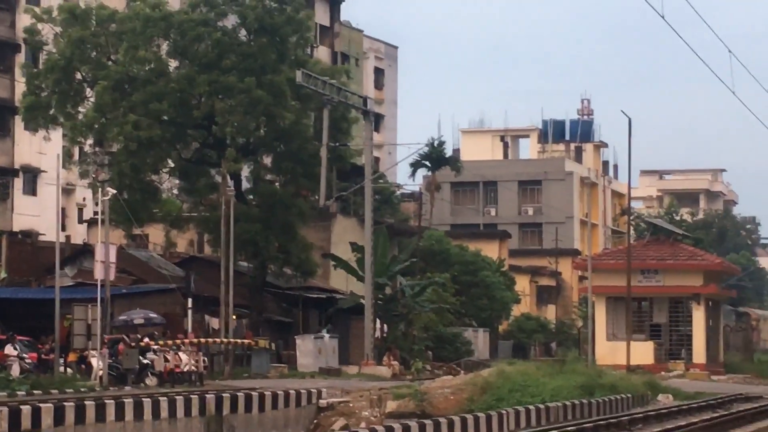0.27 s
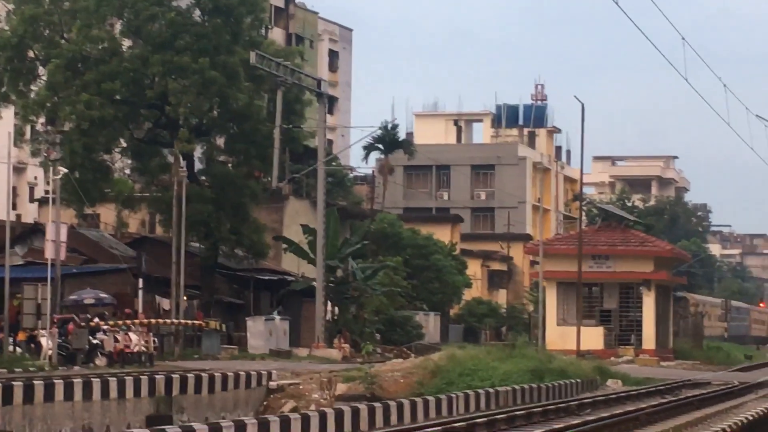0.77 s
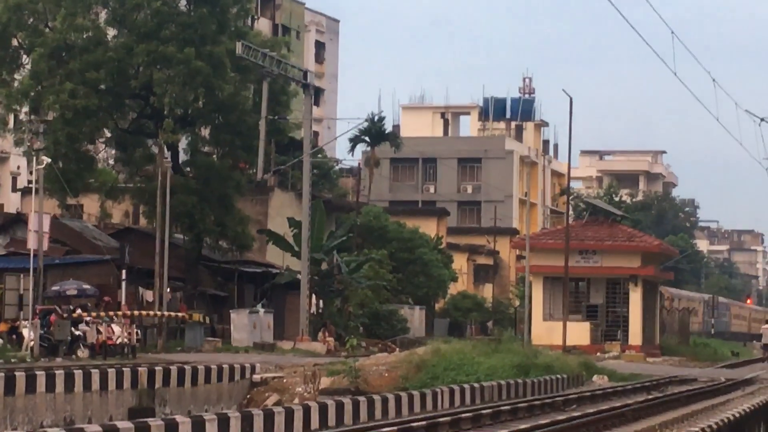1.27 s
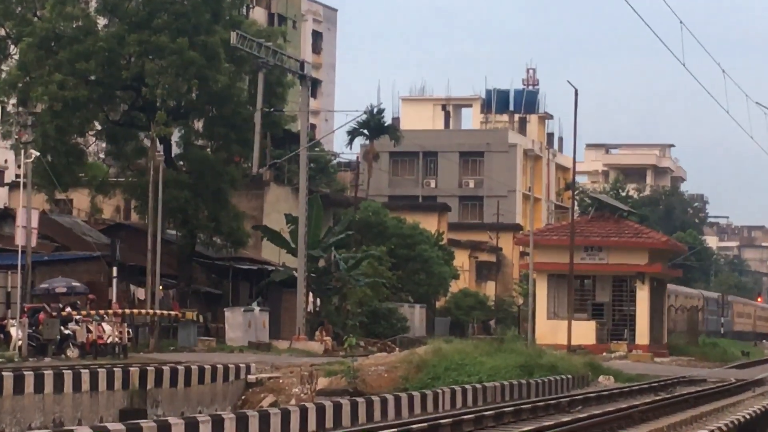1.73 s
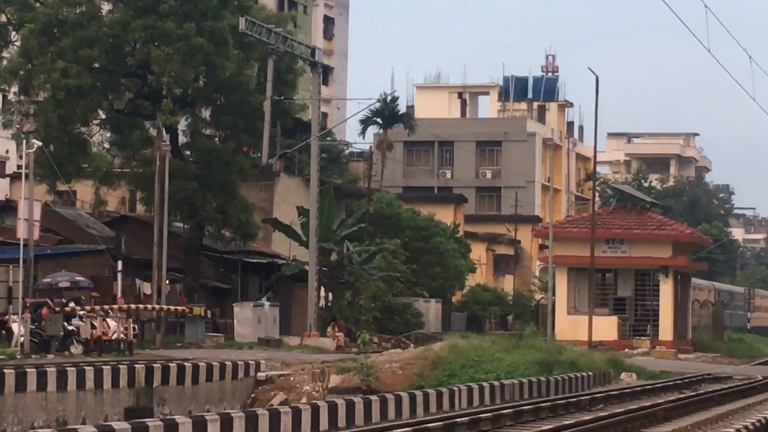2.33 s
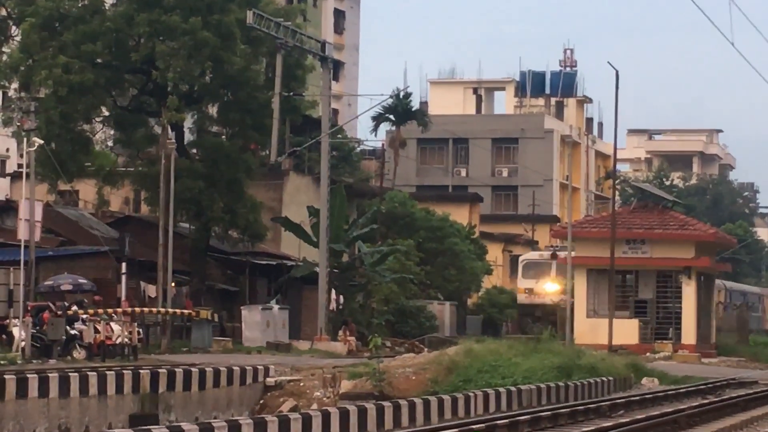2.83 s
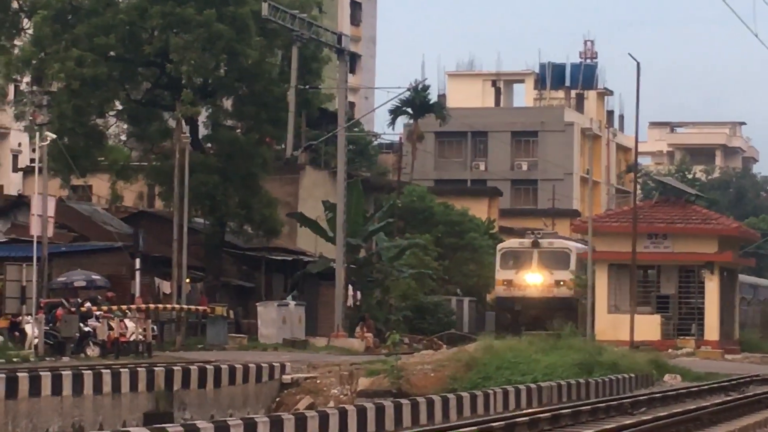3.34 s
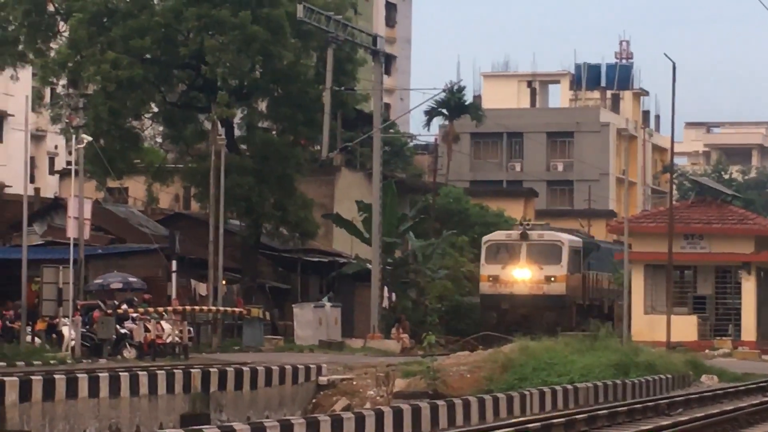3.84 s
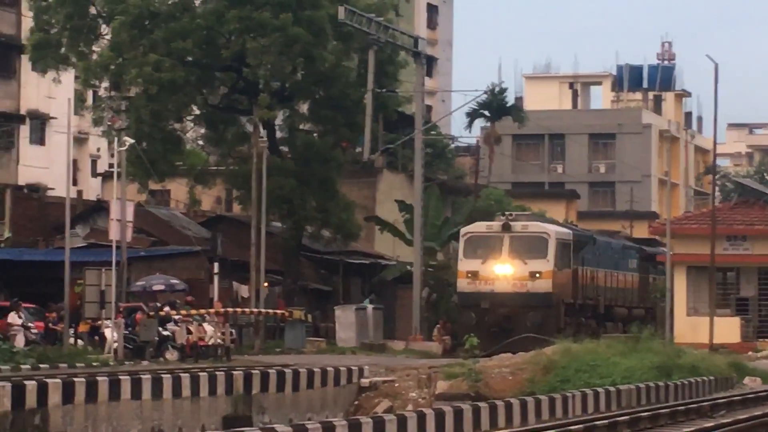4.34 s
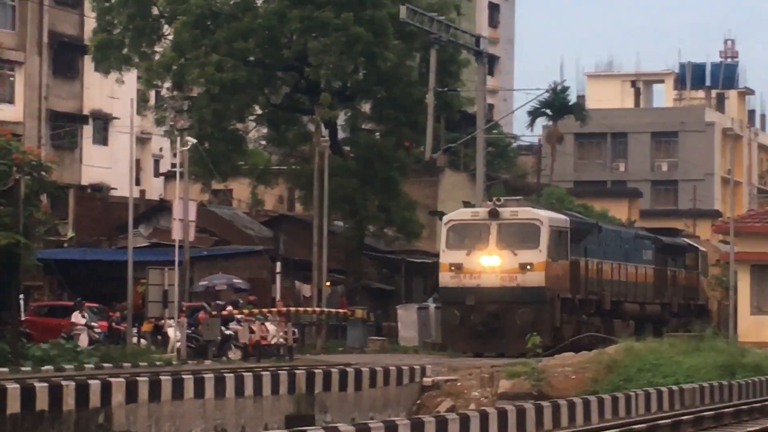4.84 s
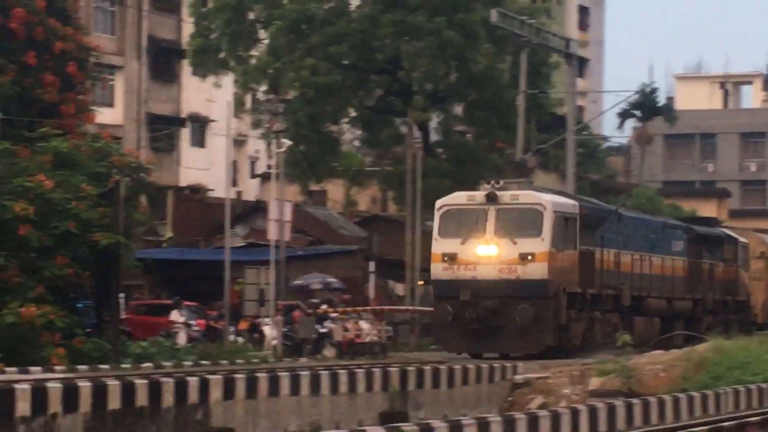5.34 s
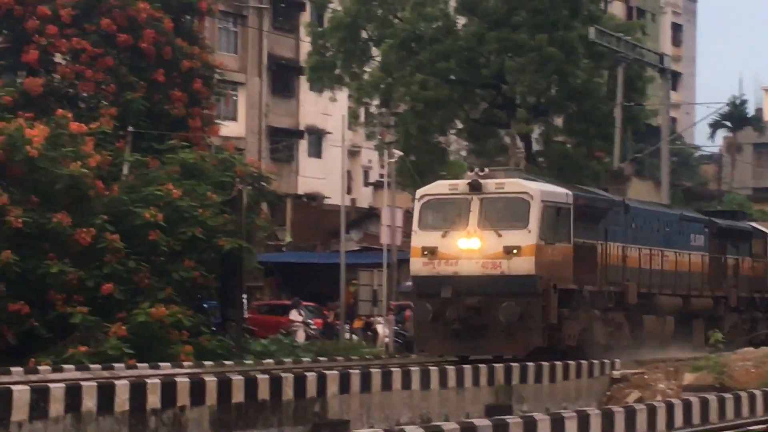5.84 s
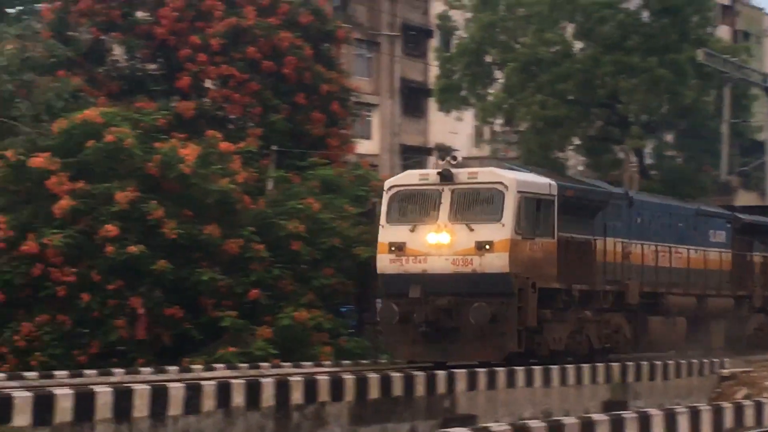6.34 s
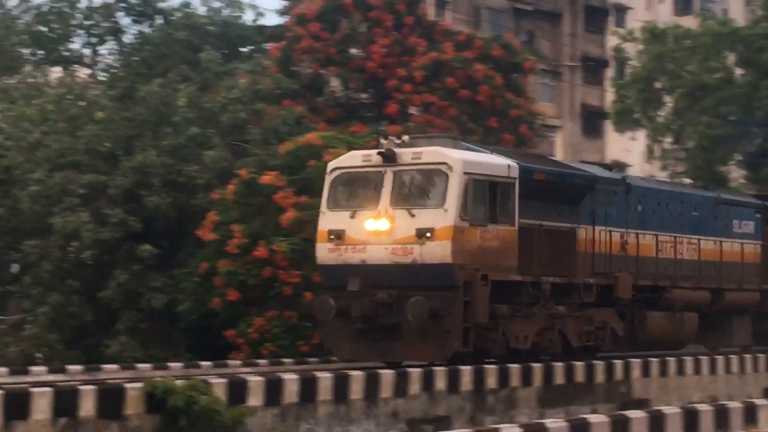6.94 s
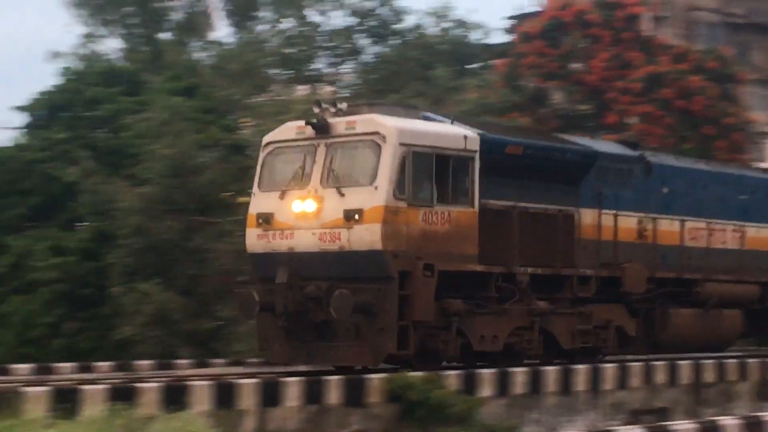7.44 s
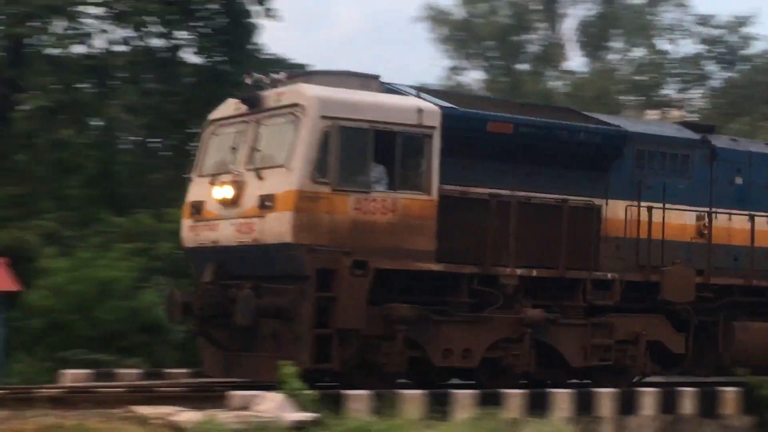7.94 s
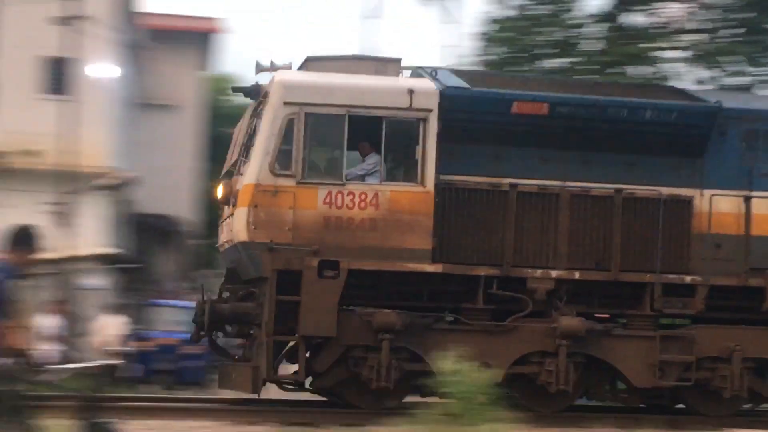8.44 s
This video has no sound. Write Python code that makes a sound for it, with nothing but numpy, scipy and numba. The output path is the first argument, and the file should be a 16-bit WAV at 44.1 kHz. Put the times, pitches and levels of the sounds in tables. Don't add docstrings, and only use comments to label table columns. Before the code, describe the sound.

Outdoors beside a railway in a town, a diesel locomotive approaches. Its low, uneven exhaust boom wavers in and out among buildings over a deep rumble, broad roar and airy hiss, with tiny wheel squeaks. Everything grows for nearly eight seconds, then a two-note air horn blasts close by, echoing off walls while the phone's automatic gain pushes the engine down.

```python
import sys
import numpy as np
from scipy import signal
from scipy.fft import rfft, irfft
from scipy.io import wavfile
from scipy.ndimage import uniform_filter1d
from numba import njit

SR = 44100
rng = np.random.default_rng(int(sys.argv[2]) if len(sys.argv) > 2 else 0)


def to_wav(s):
    ch = np.atleast_2d(s).T
    pcm = np.round(np.clip(ch, -1, 1) * 32767)
    wavfile.write(sys.argv[1], SR, pcm.astype(np.int16))


def convert_level_to_amplitude(level_db):
    exponent = np.asarray(level_db, float) / 20
    return 10 ** exponent


N = 383669
T = np.arange(N) / SR


def curves(table):
    s, *columns = np.transpose(table)
    return [np.interp(T, s, column) for column in columns]


def colour(points, hz):
    f, db = np.transpose(points)
    return convert_level_to_amplitude(np.interp(np.log(np.maximum(hz, 1)), np.log(f), db, left=-90, right=-90))


def noise(points, lo_hz, hi_hz):
    hz = np.fft.rfftfreq(N, 1 / SR)
    spectrum = rfft(rng.standard_normal(N)) * colour(points, hz)
    band = irfft(spectrum * ((hz > lo_hz) & (hz < hi_hz)), N)
    return irfft(spectrum, N) / np.std(band)


def walk(rate):
    k = int(SR / rate)
    held = np.repeat(rng.standard_normal(400), k)[:N]
    return 1.42 * uniform_filter1d(uniform_filter1d(held, k), k)


@njit
def ring(x, hz, width):
    y, band, low = np.empty(len(x)), 0., 0.
    for i in range(len(x)):
        g, k = np.tan(np.pi * hz[i] / SR), width / hz[i]
        v = (band + g * (x[i] - low)) / (1 + g * (g + k))
        band, low, y[i] = 2 * v - band, low + 2 * g * v, k * v
    return y


def bump(s, length, t=T):
    return np.exp(-(2 * (t - s) / length) ** 2)


def notch(s, length, db, t=T):
    return 1 - (1 - convert_level_to_amplitude(db)) * bump(s, length, t)


def swells(table):
    t = T[::64]
    return np.interp(T, t, sum(db * bump(s, length, t) for s, length, db in table))


def duck_db():
    start_s, depth_db, fall_s = 7.81, -7.5, 0.1
    return depth_db * (1 - np.exp(-np.maximum(T - start_s, 0) / fall_s))


# t/s, level/dB
NEARNESS = [(0, -16.5), (1.1, -15.5), (2.0, -13), (3.3, -13), (4.0, -9.5), (4.5, -8.5), (5.0, -5.5),
            (5.7, -3), (6.4, -1.5), (7.2, -0.5), (7.8, 0), (8.7, 1.5)]
# middle t/s, length/s, level/dB
GUSTS = [(1.33, 0.11, 2.5), (2.78, 0.42, 7.5), (4.33, .1, 5), (4.85, 0.11, 2), (5.3, 0.14, 1),
         (5.62, 0.22, 1), (6.0, 0.19, -2), (6.3, 0.2, 4.5), (6.67, .1, 3.5), (6.87, 0.092, 4.5),
         (7.2, .15, -0.5), (7.36, 0.12, 4.5), (7.79, 0.21, 5), (8.0, 0.097, -1.5), (8.3, 0.17, 0.5),
         (8.65, 0.11, 4)]


def layer_db(near_db, swell, gusty, ducked):
    return near_db + swell * curves(NEARNESS)[0] + gusty * swells(GUSTS) + ducked * duck_db()


# t/s, turns f/Hz
SHAFT = [(0, 13.32), (3.8, 13.32), (5, 13.314), (6.2, 13.29), (7, 13.264), (7.6, 13.238), (8.1, 13.197),
         (8.7, 13.05)]


def shaft_hz():
    return curves(SHAFT)[0]


# f/Hz, level/dB per Hz
TOWN = [(25, -7), (33, 3), (45, 15.5), (80, 12), (200, -24), (300, 2.5), (500, -3.5), (1000, -31)]


def town():
    return convert_level_to_amplitude(-41.0 + walk(2.4) + 0.58 * duck_db()) * noise(TOWN, 29, 690)


# t/s, peak level/dB, f/Hz
TICKS = [
    (2.312, -37, 1950),
    (2.312, -31, 2200),
    (2.312, -35, 2450),
]


def ticks():
    total = 0
    for s, db, hz in TICKS:
        decay = (T > s) * np.exp(-np.abs(T - s) / 0.0047)
        total = total + convert_level_to_amplitude(db) * decay * np.sin(2 * np.pi * hz * (T - s))
    return total


# middle t/s, length/s, f/Hz, level/dB
SQUEAKS = [(2.02, .03, 3100, -50), (2.08, .11, 3450, -51), (2.22, .04, 3450, -52), (4.54, .03, 3450, -45),
           (4.585, .03, 3380, -45), (4.85, .02, 3150, -43), (2.33, .06, 3480, -53), (2.69, .04, 3330, -48),
           (2.725, .035, 3550, -47), (2.755, .03, 3820, -47), (2.74, .05, 2870, -50),
           (2.85, .05, 2890, -50), (2.892, .015, 3230, -48), (2.903, .015, 3380, -49),
           (3.22, .03, 3850, -50), (3.275, .1, 3520, -48), (4.33, .015, 3950, -43),
           (4.328, .012, 4150, -45), (4.335, .012, 4400, -44), (4.76, .055, 3520, -42)]


def squeaks():
    wobble_hz = 60 * np.tile(walk(60)[:SR], 9)[:N]
    slip = np.cumsum(wobble_hz) / SR
    total = 0
    for s, length, hz, db in SQUEAKS:
        swell = np.exp(-(2 * (T - s) / length) ** 4)
        total = total + np.sqrt(2) * convert_level_to_amplitude(db) * swell * np.sin(2 * np.pi * (hz * T + slip))
    return total


# middle t/s, length/s, level/dB, f/Hz
NULLS = [(7.92, .1, -2.5, 439), (8.102, 0.056, -6, 435), (8.27, 0.063, -3.5, 433), (8.36, 0.04, -9, 432),
         (8.5, 0.016, -7, 430), (8.544, 0.024, -10, 429), (8.63, 0.044, -18, 428), (8.665, .03, 1.5, 427),
         (8.7, 0.034, -11, 427), (7.872, .02, -24, 883), (7.893, .05, -5, 881), (7.95, 0.061, 3.5, 878),
         (8.003, .04, -1, 875), (8.073, 0.037, -14, 872), (8.113, .02, -5, 865), (8.204, 0.02, -20, 868),
         (8.263, 0.064, -26, 866), (8.32, 0.085, -26, 864), (8.399, 0.02, -30, 862),
         (8.445, 0.027, -18, 861), (8.492, .04, -11, 859), (8.528, .025, -22, 858), (8.572, .016, -14, 850),
         (8.586, 0.027, 5, 856), (8.607, 0.021, -17, 856), (8.645, 0.039, -20, 855),
         (8.666, 0.022, -8.5, 854), (7.99, .14, -3.5, 310), (8.19, .05, -2.5, 308), (8.3, .2, -1.5, 307),
         (8.53, .07, 2, 305), (8.607, .08, -10, 304), (8.026, .05, -5, 619), (8.178, .05, -8, 620),
         (8.294, .03, -5, 614), (8.35, .025, -3, 613), (8.405, 0.023, -6, 612), (8.457, .025, -10, 611),
         (8.51, .04, -1, 610), (8.595, .025, -4, 608), (8.647, 0.022, -18, 607),
         (7.86, 0.11, -2, 1325), (7.985, 0.018, -1, 1312), (8.335, 0.04, -5, 1296),
              (8.4, .02, -5, 1293), (8.46, 0.062, -7, 1290), (8.553, 0.04, -6, 1286),
              (8.585, .025, 1, 1285), (8.63, .03, -3, 1284), (8.667, 0.079, -24, 1281),
              (7.83, .02, -8, 1780), (8.2, 0.11, -6, 2170), (7.827, .12, -15, 2670), (8.08, 0.11, 1, 3050),
              (7.84, .1, -2, 3540), (8.09, .28, -1, 3920), (8.285, .04, -14, 3890), (8.47, 0.39, 2, 3870),
              (8.66, .08, -10, 3845), (8.05, 0.35, 3, 4360), (8.3, 0.25, -8, 4760), (8.2, .3, -14, 5210),
              (7.83, .08, -10, 5330), (7.82, 0.1, -12, 5790), (8.4, .2, -13, 5600), (7.82, .1, -14, 6230),
              (8.25, .3, -10, 6080)]


def nulled(hz, t):
    width = .015
    gain = 0.93
    for s, length, db, null_hz in NULLS:
        near = np.exp(-((np.interp(s, t, hz) / null_hz - 1) / width) ** 4)
        if near > .01:
            gain = gain * notch(s, length, db * near, t)
    return gain


def trumpet(valve, bell):
    start, hz, held_db, over_db, sag_db, bright_db, second_db = valve
    blast_s, bloom_s, settle_s, dull_start_db = .036, .039, .06, -13
    t = T[T > start]
    age = t - start
    opening = np.minimum(age / blast_s, 1)
    pitch = hz * (1 - .033 * age + .017 * np.exp(-age / .085))
    surge_db = over_db * np.exp(-np.maximum(age - blast_s, 0) / settle_s)
    level_db = held_db + sag_db * age + surge_db
    phase = 2 * np.pi * np.cumsum(pitch * (1 + 0.0006 * walk(30)[-len(t):])) / SR
    tilt_db = bright_db + dull_start_db * np.maximum(1 - age / bloom_s, 0)
    tone = 0
    for k, db, turn_db in bell:
        shape_db = db + (k - 1) * tilt_db + turn_db * np.clip(t - 7.9, 0, .5)
        shape_db = shape_db + second_db * (k == 2) - .5 * surge_db * (k > 1)
        waver_db = .7 * walk(12)[-len(t):] * min(k - 1, 1 + (k > 5))
        wave = np.cos(k * phase + .4 * k * k)
        tone = tone + convert_level_to_amplitude(shape_db + waver_db) * nulled(k * pitch, t) * wave
    return np.pad(np.sqrt(2) * convert_level_to_amplitude(level_db) * tone * opening ** 2, (N - len(t), 0))


# valve opens t/s, pitch f/Hz, held level/dB, first-blast overshoot level/dB,
# sag level/dB per s, brightness level/dB per overtone, second overtone level/dB
HIGH_HORN = (7.778, 440, -17.5, 5.5, -3, 0.4158, -0.2)
LOW_HORN = (7.81, 313, -24, 2, 0, 0.5, 5)
# overtone number, level/dB, change as the bell turns away level/dB per s
HIGH_BELL = [(1, 2.5, -1), (2, -1.5, -1.5), (3, -4, 2), (4, -10.5, -5.5), (5, -12, -30), (6, -26.5, 1),
             (7, -24.5, 2), (8, -26, 6), (9, -24.5, 3), (10, -28, -6), (11, -32, 6), (12, -29, -10),
             (13, -30, -14), (14, -31, -5), (15, -35, -14), (16, -41, -8)]
LOW_BELL = [(1, 1.5, 0), (2, -2.5, -8.5), (3, -8.5, -3), (4, -7.5, -6), (5, -23, -19), (6, -40, -3),
            (8, -43, -7), (9, -30, 1), (10, -44, -11), (11, -30, -4), (12, -44, 10)]
# delay t/s, level/dB
YARD = [
    (0.047, -41),
    (0.084, -35),
    (.131, -44),
    (.19, -20),
]


def horn():
    street_db, street_t60_s, street_hz = -17, 1.6, 880
    direct = trumpet(HIGH_HORN, HIGH_BELL) + trumpet(LOW_HORN, LOW_BELL)
    echoes = sum(convert_level_to_amplitude(db) * np.interp(T - delay, T, direct) for delay, db in YARD)
    walls = rng.standard_normal(SR)
    tail = ring(walls, np.full(SR, 1. * street_hz), 400.0)
    tail = tail - ring(walls, np.full(SR, 1.18 * street_hz), 700.0)
    tail = tail * convert_level_to_amplitude(-60 * T[:SR] / street_t60_s) * (T[:SR] > .03)
    tail = tail / np.sqrt(np.sum(tail ** 2) * SR / (np.pi * 300.))
    return direct + echoes + convert_level_to_amplitude(street_db + 11.5) * signal.fftconvolve(direct, tail)[:N]


# middle t/s, length/s, level/dB
GAPS = [(.08, .25, 0), (2.05, 0.23, 1), (2.15, 0.92, 1), (2.5, .3, 0.5), (3.3, 0.41, 1.3),
        (4.45, 0.17, -0.8), (5.0, .15, 1), (5.6, .15, -0.5), (6.35, .15, -0.2), (6.62, 0.29, -0.1),
        (7.07, .25, -0.5), (7.35, 0.12, 0.5), (7.65, 0.57, 0), (8.3, 0.96, 1.8)]


def roar_db():
    return layer_db(-25, swell=0.98, gusty=0.16, ducked=1.03) + swells(GAPS)


# f/Hz, level/dB per Hz
RUMBLE = [(25, -34), (45, -9), (70, -2), (100, 9.5), (140, -2.5), (210, -6.5), (270, -33), (400, -27),
          (600, -42)]


def rumble():
    return convert_level_to_amplitude(-31.5 + 0.5 * (roar_db() + 30.0) + 1.9 * walk(2.88)) * noise(RUMBLE, 40, 300)


# f/Hz, level/dB per Hz
BODY = [(120, 17), (210, -15), (270, -6), (450, -5.5), (550, 0.5), (1450, -1.5), (1700, -6), (2400, -11.5),
        (4000, -15.5), (8000, -42)]
# f/Hz, level/dB per Hz
HISS = [(1200, -25), (2000, -3.5), (3700, -1), (4500, -3), (5800, -4), (7000, -8.5), (7800, -14),
        (10000, -11.5), (12000, -20)]


def roar(flicker_db):
    body = convert_level_to_amplitude(roar_db() + 0.83 * walk(6)) * noise(BODY, 320, 2000)
    hiss_db = layer_db(-30.5, swell=1.11, gusty=0.67, ducked=0.87)
    return body + convert_level_to_amplitude(hiss_db + 0.72 * flicker_db) * noise(HISS, 2370, 8600)


# middle t/s, length/s, f/Hz, width f/Hz, level/dB
PANELS = [(0.54, 0.87, 1030, 130, 2), (1.7, 1.1, 513, 65, 4), (2.3, 1.9, 630, 47, 3),
          (2.1, 2.3, 1460, 51, 2.5), (2.7, 8, 1580, 100, -2.5), (3.96, 0.98, 1000, 160, 1.5),
          (5, 2.5, 596, 55, -4.5), (4.9, 2, 454, 120, -5.5), (6.3, 3, 1410, 91, -2.5),
          (6.1, 1.2, 374, 49, 3), (5.7, 3.5, 520, 29, 3), (6.6, 2, 696, 99, -4), (7.4, 1.4, 930, 260, 4),
          (7.2, 1.5, 2100, 69, 1.5), (7.8, 1.6, 1740, 86, -3), (4.6, 1.1, 3450, 230, 1),
          (2, 0.59, 3300, 400, 1.5)]


def panels(x):
    total = x
    for s, length, hz, width, db in PANELS:
        resonance = ring(x, hz * (1 + .01 * walk(1.7)), 1. * width)
        total = total + (convert_level_to_amplitude(db) - 1) * bump(s, length) * resonance
    return total


# f/Hz, level/dB per Hz
JET = [(9800, -25), (10600, 0), (12300, 0), (13000, -10), (14000, -30)]
# f/Hz, level/dB per Hz
AIR = [(6000, 4), (8000, -4.5), (9500, -1), (10500, -2.5), (12500, -2), (13500, -30)]


def turbocharger(flicker_db):
    doppler = shaft_hz() / SHAFT[0][1]
    blade_hz = 11780 * doppler * np.interp(T, [2, 6.3], [.986, .997])
    shoulder_hz = 11250 * doppler
    jet, wake = noise(JET, 10000, 13000), noise(JET, 10000, 13000)
    blades = ring(ring(jet, blade_hz, 560.0), blade_hz, 560.0)
    shoulder = ring(ring(wake, shoulder_hz, 1200.0), shoulder_hz, 1200.0)
    far_db = np.interp(T, [0, 6.5], [-1.5, -9])
    power = blades.var() + convert_level_to_amplitude(2 * far_db) * shoulder.var()
    turbo = (blades + convert_level_to_amplitude(far_db) * shoulder) / np.sqrt(power)
    turbo_db = layer_db(-31.5, swell=1.5, gusty=0.7, ducked=0.82)
    return convert_level_to_amplitude(turbo_db + 0.23 * flicker_db) * (turbo + convert_level_to_amplitude(-10.5) * noise(AIR, 6900, 12500))


# f/Hz, level/dB per Hz
FINE = [(11800, -25), (12400, 5), (13500, 0), (14500, 0), (16000, -1)]


def fine_air(flicker_db):
    fine_db = layer_db(-45, swell=1.65, gusty=1, ducked=0)
    return convert_level_to_amplitude(fine_db + 1.1 * flicker_db) * noise(FINE, 12600, 16700)


# f/Hz, level/dB against the roar, faces the phone at t/s, for length/s
WHINES = [(244, -23, 5, 9), (629, -10, 7.7, 1.0), (1147, -8, 7.0, 1.4), (1467, -8, 6.2, 1.6),
          (3776, -19, 6.0, 1.6), (7560, -36, 6, 5)]


def whines():
    doppler = shaft_hz() / SHAFT[0][1]
    total = 0
    for hz, db, s, length in WHINES:
        level_db = db - 10 * (1 - bump(s, length)) + 3.5 * walk(9)
        pitch = hz * doppler * (1 + .002 * walk(14))
        total = total + convert_level_to_amplitude(level_db) * np.sin(2 * np.pi * np.cumsum(pitch) / SR)
    return convert_level_to_amplitude(uniform_filter1d(roar_db(), 8000)) * total


def machinery():
    flicker_db = walk(9) + walk(30)
    bass = rumble()
    plain_roar = roar(flicker_db)
    treble = turbocharger(flicker_db) + fine_air(flicker_db)
    return bass + treble + whines() + panels(plain_roar)


# pitch ratio, level/dB, fades f/Hz
FRONTS = [
    (.924, -32.5, 1.29),
    (.943, -32.5, 1.86),
    (.962, -36, 1.5),
    (1.039, -39.5, 2.27),
]


def house_fronts(turn):
    total = 0
    for ratio, db, rate in FRONTS:
        level = convert_level_to_amplitude(db + 6.2 * walk(rate))
        phase = 2 * np.pi * (8 * ratio * turn + 0.36 * walk(rate))
        total = total + level * np.sqrt(2) * np.cos(phase)
    return total * convert_level_to_amplitude(np.interp(T, [0, 2.5, 6, 7.6, 7.9], [-4.0, -7.0, -0.5, -7.0, -14]))


# middle t/s, length/s, level/dB
OCTAVE_SWELLS = [
    (1.6, 0.63, 7),
    (2.5, 1.1, 12),
    (3.6, 1.2, 11),
    (4.2, 0.63, 14),
    (5.6, 0.86, 19),
    (7.0, 1.8, 21),
]
# t/s, level/dB
THIRD = [(0, -64), (1.5, -55), (3.3, -53), (4, -79), (5.5, -47), (5.9, -40), (6.6, -36.5), (6.9, -36.5),
         (7.3, -33.5), (7.8, -29.5), (8.7, -40)]


def firing_harmonics(turn):
    octave_db = -58.5 + swells(OCTAVE_SWELLS) + duck_db()
    octave = convert_level_to_amplitude(octave_db) * np.cos(2 * np.pi * 16 * turn + walk(9))
    third_db = curves(THIRD)[0] + duck_db()
    return octave + convert_level_to_amplitude(third_db) * np.cos(2 * np.pi * 24 * turn + .6 * walk(9))


# t/s, firing level/dB, lope level/dB
BOOM = [(0, -25, -33.5), (.9, -19.5, -36), (1.5, -23, -34), (2.3, -20.5, -30.5), (3.0, -16, -30.5),
        (3.5, -20.5, -35), (4.5, -17, -29), (5.4, -15.5, -26), (6.1, -17, -23), (6.5, -14, -20),
        (6.95, -10, -21.5), (7.4, -17, -22), (7.75, -13, -21), (8.25, -9.5, -24), (8.7, -10, -18)]
CYLINDERS = [-14, -9, 0, 0, 0, 0, 0, 0]
# f/Hz, level/dB
EXHAUST = [(35, -24), (53, -10), (66, -5), (80, -9), (93, -4), (120, 0), (133, -2), (146, -6), (160, -4),
           (173, -12), (200, -19), (213, -33), (226, -23), (260, -36)]


def lope(turn):
    orders = np.arange(3, 20)
    pattern = np.fft.fft(convert_level_to_amplitude(np.array(CYLINDERS)))[orders % 8]
    weights = pattern * colour(EXHAUST, orders * SHAFT[0][1])
    blur = np.interp(T, [0, 5.3, 6.3], [1.4, 1.0, .15])
    deep_db = 8.5 * np.clip((T - 7.5) / 0.31, 0, 1)
    total = 0
    for k, weight in zip(orders, weights):
        if k == 8:
            continue
        level = convert_level_to_amplitude(1.5 * walk(2.5) + deep_db * (k < 7))
        phase = 2 * np.pi * k * turn + blur * walk(1.5)
        total = total + level * np.real(weight * np.exp(1j * phase))
    upper = np.sqrt(np.sum(np.abs(weights[6:8]) ** 2) / 2)
    lope_db = curves(BOOM)[1] + 1.6 * duck_db()
    return convert_level_to_amplitude(lope_db) * total / upper


# middle t/s, length/s, level/dB
FADES = [(0.056, 0.14, -21), (0.37, 0.12, -28), (0.466, 0.11, -18), (0.62, 0.17, -16), (1.134, 0.11, -8),
         (1.253, 0.14, -29), (1.574, 0.037, -20), (1.818, 0.059, -15), (2.005, 0.11, -27),
         (2.69, 0.081, -15), (2.765, 0.044, -26), (2.889, .03, -12), (3.607, 0.06, -12), (3.8, 0.077, -23),
         (3.876, 0.089, -27), (3.978, 0.033, -26), (4.065, 0.13, -26), (4.352, 0.068, -22),
         (4.548, 0.067, -21), (4.764, .08, -6), (5.1, 0.071, -5), (5.493, 0.095, -16), (5.673, 0.065, -10),
         (5.801, 0.1, -7), (6.26, .06, -1), (8.7, 0.18, -1)]


def firing_tone(turn):
    t = T[::64]
    fades = np.prod([notch(*fade, t) for fade in FADES], axis=0)
    tone = np.sqrt(2) * np.cos(2 * np.pi * 8 * turn) * np.interp(T, t, fades)
    return convert_level_to_amplitude(curves(BOOM)[0] + 1.4 * duck_db()) * tone


def exhaust():
    turn = np.cumsum(shaft_hz()) / SR
    turn = turn - turn[5 * SR] + .3465
    return lope(turn) + firing_harmonics(turn) + firing_tone(turn) + house_fronts(turn)


def scene():
    return (exhaust() + machinery() + horn() + ticks() + squeaks() + town())[None]


# middle t/s, length/s, up to f/Hz
DROPOUTS = [(.44, .03, 13600), (.7, .03, 13000), (.98, .1, 15200), (1.1, .07, 13200), (1.32, .09, 14400),
            (1.52, .03, 13600), (1.95, .04, 14900), (2.0, .12, 13100), (2.72, .12, 14300),
            (3.04, .03, 14900), (3.08, .08, 13600), (3.36, .04, 14300), (3.68, .14, 13600),
            (3.8, .06, 14500), (3.92, .05, 14400), (4.25, .04, 13600), (4.36, .04, 13600),
            (4.49, .04, 14300), (4.66, .06, 14200), (5.31, .03, 13700), (5.79, .05, 13700),
            (6.1, .03, 13600), (6.32, .03, 13700)]


def treble_dropouts(x):
    from_hz, stray_to_hz, stray_until_s, ragged_hz = 12400, 14000, 8.4, 350
    hz, s, z = signal.stft(x, SR, nperseg=1024)
    hz = hz[:, None]
    share = .2 * np.clip((stray_until_s - 3 * s) / 4, 0, 1)
    patches = np.repeat(rng.random((65, len(s))) < share, 8, axis=0)
    patches = np.repeat(patches, 3, axis=1)[:len(hz), :len(s)]
    empty = patches & (hz < stray_to_hz) & (s < stray_until_s)
    for middle, length, top_hz in DROPOUTS:
        edge_hz = top_hz + ragged_hz * rng.standard_normal(len(s))
        empty = empty | ((np.abs(s - middle) < length / 2) & (hz < edge_hz))
    return signal.istft(z * ~(empty & (hz > from_hz)), SR, nperseg=1024)[1][..., :N]


# f/Hz, width f/Hz, level/dB
PORT = [
    (4960, 320, -5.5),
    (10100, 680, -4),
]


def microphone(x):
    hz = np.fft.rfftfreq(N, 1 / SR)
    port_db = sum(db / (1 + ((hz - f) / (width / 2)) ** 2) for f, width, db in PORT)
    rounded = np.tanh(.78 * x) / .78
    return irfft(rfft(rounded) * convert_level_to_amplitude(port_db) * (hz < 15730), N)


def top_cut(x):
    return signal.sosfilt(signal.butter(12, 16860, fs=SR, output="sos"), x)


def record(dry):
    mix = treble_dropouts(microphone(dry))
    return top_cut(mix)


dry = scene()
out = record(dry)
to_wav(out)
```